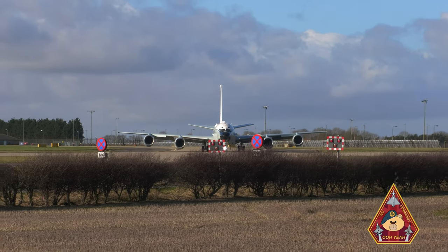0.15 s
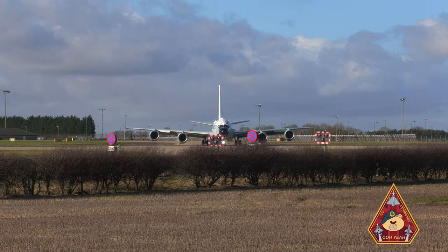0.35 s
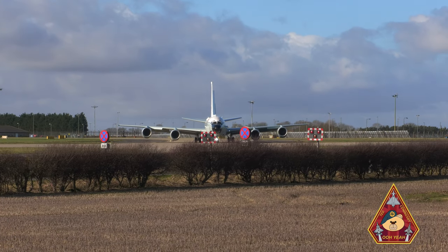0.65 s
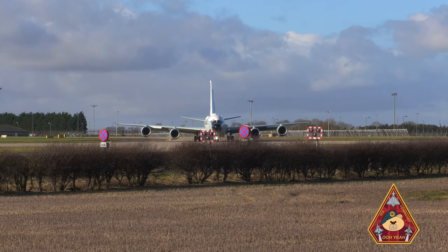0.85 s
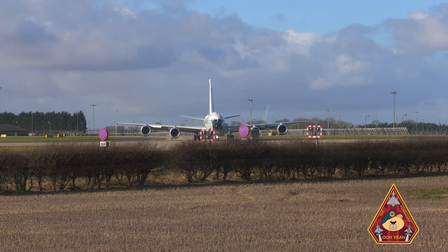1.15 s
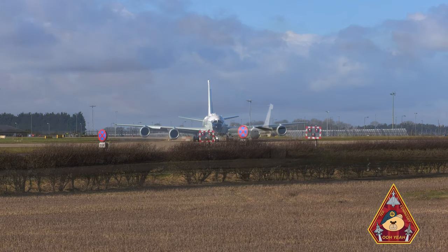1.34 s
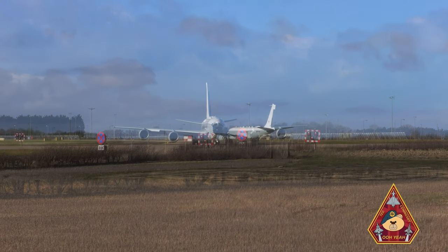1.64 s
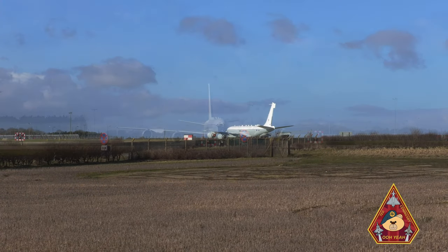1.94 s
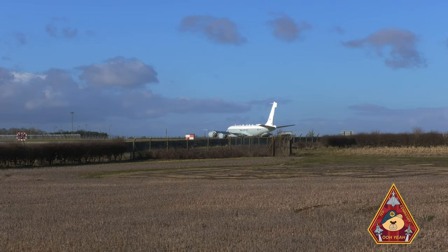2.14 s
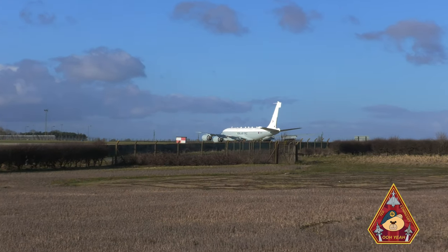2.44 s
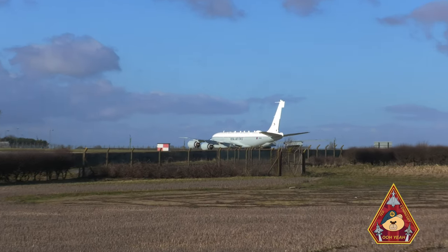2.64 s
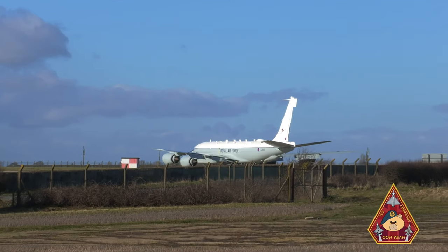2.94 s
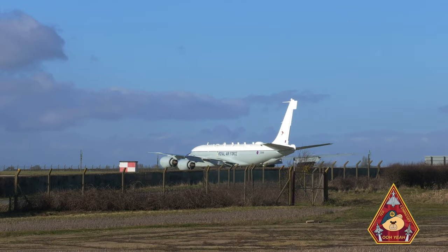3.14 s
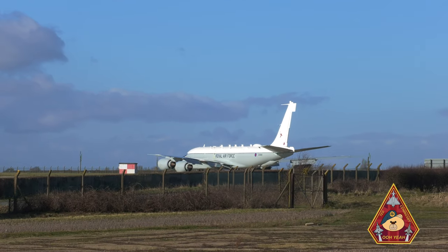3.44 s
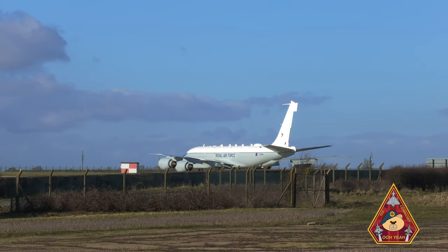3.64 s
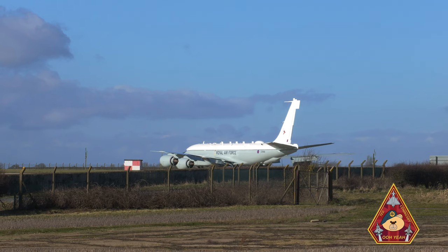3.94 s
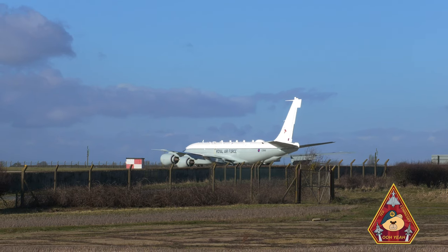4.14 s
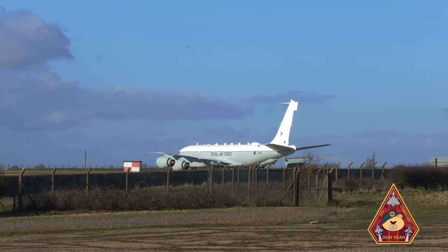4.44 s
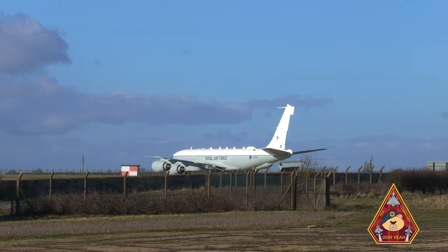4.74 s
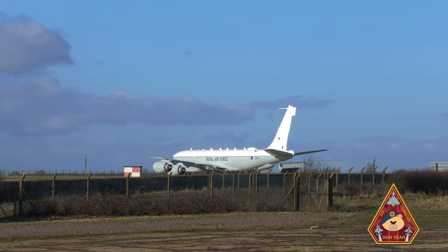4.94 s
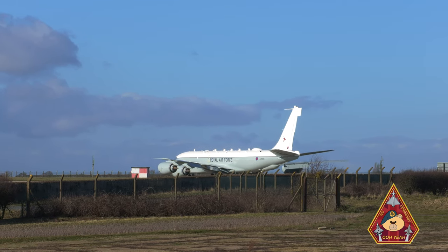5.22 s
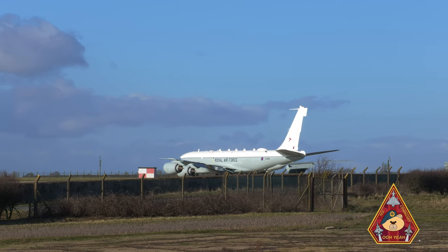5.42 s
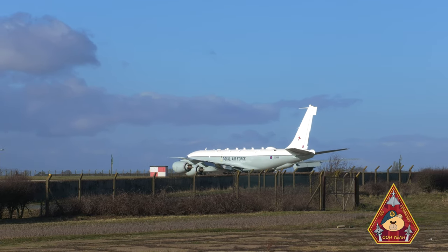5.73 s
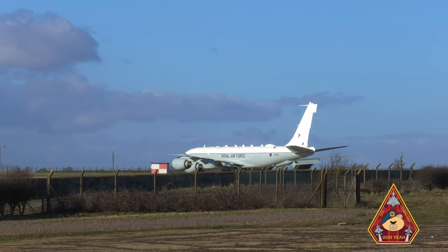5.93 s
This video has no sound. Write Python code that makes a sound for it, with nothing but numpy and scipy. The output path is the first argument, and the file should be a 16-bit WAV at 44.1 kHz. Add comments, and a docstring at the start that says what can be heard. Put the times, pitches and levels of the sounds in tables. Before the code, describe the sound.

Jet engines hiss and whine nose-on across a windy airfield, then blend into a low tail-on roar with a hollow howl and buffeting wind.

```python
"""On a windy airfield, beyond a hedge, jet aircraft are heard in two views: nose-on, then tail-on.
One view crossfades into the other: first intakes hiss and fans whine, then exhausts roar and howl.
Shaped noise makes the hiss, roar and drone; unsteady sine tones make the whines and howls.
Wind rumbles on the microphone, dry stalks rustle and snap, and a thin whistle sounds once.
A limiter holds down the peaks."""
import sys
import numpy as np
from scipy import signal
from scipy.fft import rfft, irfft
from scipy.io import wavfile
from scipy.ndimage import uniform_filter1d, minimum_filter1d

SR = 44100
rng = np.random.default_rng(int(sys.argv[2]) if len(sys.argv) > 2 else 0)


def to_wav(s):
    """Save 16-bit WAV."""
    ch = np.atleast_2d(s).T  # columns
    pcm = np.round(np.clip(ch, -1, 1) * 32767)  # PCM
    wavfile.write(sys.argv[1], SR, pcm.astype(np.int16))


N = 268128
TIME = np.arange(N) / SR  # seconds
BINS = np.fft.rfftfreq(N, 1 / SR)  # Hz
CROSSFADE_START_S, CROSSFADE_LENGTH_S = 1.38, 0.72
# the treble of the nose-on view flares briefly
FLARE_S, FLARE_WIDTH_S = 1.166, 0.26
DRONE_DIP_SHARE = 0.45  # the drone and the howl dip less than the roar


def amp(db):
    """Decibels to gain."""
    return 10 ** (np.asarray(db) / 20)


def evened(x):
    """Scales to rms 1."""
    return x / np.sqrt(np.mean(x ** 2) + 1e-20)


def follow(rows):
    """Draws each column of a table as a curve, sample by sample."""
    s, *columns = np.transpose(rows)
    return [np.interp(TIME, s, column) for column in columns]


def swell(s, width_s):
    """A smooth rise to 1 at the given time, and the fall after it."""
    return np.exp(-((TIME - s) / width_s) ** 2)


def swells(rows):
    """Sum of the swells in a table, in dB."""
    return sum(rise_db * swell(s, width_s) for s, width_s, rise_db, *_ in rows)


def wander(rate_hz):
    """Slow random motion of rms 1, up to about the given rate."""
    spectrum = rfft(rng.standard_normal(N))
    return evened(irfft(spectrum / (1 + (BINS / rate_hz) ** 4), N))


def waver(depth_db, rate_hz):
    """Gain of a sound that moving air makes unsteady."""
    return amp(depth_db * wander(rate_hz))


def colour(points, hz):
    """Gain of a spectrum at the given frequencies."""
    f, db = np.transpose(points)
    return amp(np.interp(np.log(hz + 1), np.log(f + 1), db))


def noise(points):
    """Steady noise of rms 1 with the given spectrum."""
    spectrum = rfft(rng.standard_normal(N))
    return evened(irfft(spectrum * colour(points, BINS), N))


def turbulence(points, patchy_db):
    """Coloured noise that moving air breaks into patches in time and frequency."""
    hz = np.fft.rfftfreq(2048, 1 / SR)
    a, b, patches = rng.standard_normal((3, N // 512 + 5, len(hz)))
    patches = uniform_filter1d(patches, size=9, axis=0)  # smooth in time
    patches = evened(uniform_filter1d(patches, size=16, axis=1))  # smooth in frequency
    frames = (a + 1j * b) * colour(points, hz) * amp(patchy_db * patches)
    return evened(signal.istft(frames.T, nperseg=2048, noverlap=1536)[1][:N])


def treble_of(x, edge_hz):
    """The part of a sound above the given frequency."""
    return irfft(rfft(x) * BINS ** 4 / (BINS ** 4 + edge_hz ** 4), N)


def tone(hz, drift_hz, flutter):
    """A note of drifting pitch; scattered paths flutter around the direct one."""
    cycles = np.cumsum(hz + drift_hz * wander(rate_hz=7.36)) / SR
    paths = 1 + flutter * (wander(rate_hz=22) + 1j * wander(rate_hz=18))
    return evened((paths * np.exp(2j * np.pi * cycles)).real)


def crossfaded():
    """Share of the crossfade done: 0 nose-on view, 1 tail-on view."""
    return np.clip((TIME - CROSSFADE_START_S) / CROSSFADE_LENGTH_S, 0, 1)


def since_crossfade():
    """Seconds since the end of the crossfade, negative before it."""
    return TIME - CROSSFADE_START_S - CROSSFADE_LENGTH_S


def nose_on(fade_power=1.62):
    """Gain of the nose-on view, which fades out fast in the crossfade."""
    return (1 - crossfaded()) ** fade_power


def lull(s=1.52, width_s=0.14, level_db=-4):
    """Gain that sinks while the wind drops."""
    return amp(level_db * swell(s, width_s))


def air(level_db=-69.5, fall_db_per_s=2.5):
    """A faint even hiss of the breeze, slowly dying away."""
    level = amp(level_db - fall_db_per_s * TIME)
    return level * waver(depth_db=0.7, rate_hz=8) * rng.standard_normal(N)


# tone balance of the wind rumble: pitch_hz [Hz], relative_level_db [dB per Hz]
WIND_COLOUR = [(5, -17), (18, -3), (34, -0.5), (55, -0.5), (90, -0.4), (130, -7), (190, -13.5),
               (300, -27.5), (700, -53.5), (4000, -120)]
# gusts: peak_s [s], width_s [s], rumble_rise_db [dB], dip_of_other_sounds_db [dB]; a minus sign reverses either
GUSTS = [(.7, 0.073, 1.5, 1), (1.21, 0.07, 3.5, 0.5), (1.879, 0.024, 8, -1), (2.11, 0.081, 2, 3.5),
         (2.45, 0.063, 8.5, 2), (2.75, 0.12, 7, 1), (2.885, 0.027, -4, 5.5), (3.0, 0.079, 3, 1),
         (3.33, 0.25, 3.5, 1.5), (3.91, 0.054, 9, -2), (4.06, 0.046, 3.5, 4), (4.87, .065, 3, 5.5),
         (5.052, 0.097, 9.5, 3.5), (5.315, 0.054, 11.5, 5.5), (5.71, 0.078, 4, -2.5),
         (5.95, 0.059, 4.5, -2.5)]


def wind(start_db=-23, growth_db_per_s=0.5):
    """Eddies at the microphone make a lumpy rumble that freshens slowly and follows the gusts."""
    eddies = noise(WIND_COLOUR)
    eddies /= np.sqrt(uniform_filter1d(eddies ** 2, size=6000))  # removes chance swells
    level = amp(start_db + growth_db_per_s * TIME + swells(GUSTS))
    return level * waver(depth_db=1.1, rate_hz=14) * eddies


def dips():
    """Gain of other sounds in the gusts: mostly it sinks briefly, sometimes it rises."""
    return amp(-sum(dip_db * swell(s, width_s) for s, width_s, _, dip_db in GUSTS))


# tone balance of the rustle: pitch_hz [Hz], relative_level_db [dB per Hz]
RUSTLE_COLOUR = [(800, -30.5), (4000, 0.5), (7500, 7.5), (8600, -17.5), (12000, -17.5), (15500, -23)]
# tone balance of the ticks and snaps: pitch_hz [Hz], relative_level_db [dB per Hz]
SNAP_COLOUR = [(1500, -25), (4500, 3.5), (7500, 9.5), (9000, -0.5), (13000, 1), (15500, -5.5)]
# flurries of rustling: peak_s [s], width_s [s], rise_db [dB]
FLURRIES = [(2.26, .12, 9), (4.38, .13, 13), (4.6, .07, 14), (5.21, 0.097, 14), (5.46, 0.097, 16),
            (5.91, 0.14, 16)]


def stalks(early_db=-65.5, late_db=-74.5, grain_db=2.5, ticks_per_s=35, tick_db=7, tick_s=0.001):
    """Dry stalks make a grainy rustle with scattered ticks; both rise in flurries."""
    level_db = early_db + (late_db - early_db) * crossfaded() + swells(FLURRIES)
    grain = evened(waver(grain_db, rate_hz=90))
    rustle = grain * noise(RUSTLE_COLOUR)
    knocks = (rng.random(N) < ticks_per_s / SR) * np.minimum(rng.exponential(1, N), 2)
    # each knock dies away over about tick_s
    envelope = signal.lfilter([1], [1, -np.exp(-1 / (tick_s * SR))], knocks + 1e-12)
    ticks = amp(tick_db) * crossfaded() * envelope * noise(SNAP_COLOUR)  # tick_db is against the rustle
    return amp(level_db) * (rustle + ticks)


# loudest snaps among the stalks: peak_s [s], relative_level_db [dB]
SNAPS = [(3.7025, -49), (4.2936, -46), (4.399, -44), (4.5685, -35), (4.5899, -40), (4.603, -45),
         (4.618, -44), (4.7875, -49), (5.258, -39.5), (5.3886, -42), (5.892, -39), (5.9528, -45),
         (6.0152, -40)]


def snaps(snap_s=0.0026, trim_db=-2):
    """Stalks knock together: each snap is a few milliseconds of bright noise."""
    envelope = np.zeros(N)
    for s, db in SNAPS:
        age = np.clip((TIME - s) / snap_s + 1, 0, 25)  # 1 at the peak
        envelope += amp(db + trim_db) * age * np.exp(-age)
    return envelope * noise(SNAP_COLOUR)


def whistle(s=2.75, width_s=0.1, hz=5735, level_db=-63):
    """One faint, thin note that swells and fades."""
    return amp(level_db) * swell(s, width_s) * tone(hz, drift_hz=6, flutter=0.2)


# tone balance of the drone: pitch_hz [Hz], relative_level_db [dB per Hz]
DRONE_COLOUR = [(30, -39.5), (110, -15.5), (195, -3), (275, -1.5), (345, 4.3), (400, 1), (460, -4.5),
                (540, -10.5), (750, -16.5), (1200, -37), (5000, -100)]
# loudness of the drone, weakest early in the crossfade: time_s [s], level_db [dB]
DRONE_LEVEL = [(0, -28.5), (1.15, -26), (1.55, -33.5), (2.2, -28), (3.15, -24.5), (6.08, -23.5)]
# tone balance of the roar: pitch_hz [Hz], relative_level_db [dB per Hz]
EXHAUST_COLOUR = [(280, -36.5), (530, -14.5), (680, -4), (770, -3), (950, -7.5), (1400, -10.5), (2020, -19),
                  (2330, -17.5), (2900, -24.5), (3500, -28), (4250, -38), (5400, -40.5), (6400, -53),
                  (9500, -64)]
# surges of roar carried over by the breeze: peak_s [s], width_s [s], rise_db [dB]
SURGES = [(2.31, 0.062, -0.5), (2.53, .04, 0), (2.76, 0.15, 1), (3.22, 0.097, 3.5), (3.45, 0.075, 2.5),
          (3.73, .055, 2.5), (4.7, 0.11, 1.2), (5.93, 0.07, 1.5)]


def exhausts(nose_db=-44, tail_db=-28.5, growth_db_per_s=0.79, fade_power=0.6,
             deepen_s=5.83, deepen_width_s=0.22, deepen_db=4.5, deep_hz=660, deep_width_hz=120,
             treble_hz=3200, treble_db=1.65, treble_fall_db_per_s=0.38):
    """Jets mixing with air roar, slowly dulling, above the low drone of the engine cores."""
    roar = turbulence(EXHAUST_COLOUR, patchy_db=0.68)
    low_mid = irfft(rfft(roar) * np.exp(-((BINS - deep_hz) / deep_width_hz) ** 2), N)
    deep_db = deepen_db * swell(deepen_s, deepen_width_s)
    bright_db = treble_db - treble_fall_db_per_s * since_crossfade()
    treble = treble_of(roar, treble_hz)
    roar = roar + (amp(deep_db) - 1) * low_mid + (amp(bright_db) - 1) * treble

    # the tail-on roar fades in early in the crossfade, then keeps growing
    tail_on = amp(tail_db + growth_db_per_s * since_crossfade()) * crossfaded() ** fade_power
    gain = amp(nose_db) * nose_on() + tail_on
    drone_db, = follow(DRONE_LEVEL)
    drone = amp(drone_db) * turbulence(DRONE_COLOUR, patchy_db=1.0)
    carried = amp(swells(SURGES)) * dips()
    unsteady_roar = gain * waver(depth_db=0.86, rate_hz=16) * roar
    return unsteady_roar * carried + drone * carried ** DRONE_DIP_SHARE


# long swells of the howl: peak_s [s], width_s [s], level_db [dB]
HOWLS = [(1.7, .24, -25.5), (2.08, 0.25, -16.5), (2.5, 0.33, -18), (3.35, 0.44, -26), (3.85, 0.15, -21),
         (4.33, 0.4, -18.5), (5.8, 0.67, -37)]
# pitch of the stronger howl, mostly creeping upward: time_s [s], pitch_hz [Hz]
HOWL_PITCH = [(1.4, 402), (2.1, 408), (3.62, 411), (3.83, 417), (4.25, 413), (4.42, 417.5), (6.08, 425)]


def howls(neighbour_ratio=1.085, neighbour_db=-12.5):
    """Two exhaust ducts sing near-pure notes, the second higher and weaker."""
    gain = sum(amp(level_db) * swell(s, width_s) for s, width_s, level_db in HOWLS)
    hz, = follow(HOWL_PITCH)
    flutter = np.interp(TIME, [2.2, 4.0], [0.15, 0.33])  # the note grows less steady
    strong = tone(hz, drift_hz=1.08, flutter=flutter)
    weak = amp(neighbour_db) * tone(neighbour_ratio * hz, drift_hz=3.5, flutter=0.45)
    return gain * (strong + weak) * dips() ** DRONE_DIP_SHARE


# tone balance of the intake hiss: pitch_hz [Hz], relative_level_db [dB per Hz]
INTAKE_COLOUR = [(200, -39), (480, -17), (730, -12), (1050, -11), (1300, -6), (1500, -10.5), (1820, -10),
                 (2650, -14.5), (2970, -21), (3500, -21), (4400, -34.5), (5350, -39), (6400, -58),
                 (9000, -80), (13000, -96.5)]
# faint shaft and compressor tones: pitch_hz [Hz], level_against_hiss_db [dB, before the flare]
WHINES = [(942, -20), (1262, -21), (1750, -24.5), (1884, -24), (2368, -25.5), (3320, -30.5), (3806, -31),
          (4098, -38), (5173, -37.5)]


def intakes(level_db=-19, treble_flare_db=9, whine_flare_db=4):
    """Blades make a broad hiss with thin compressor whines; its treble and the whines flare once."""
    flare = swell(FLARE_S, FLARE_WIDTH_S)
    hiss = turbulence(INTAKE_COLOUR, patchy_db=1.5)
    extra_treble = (amp(treble_flare_db * flare) - 1) * treble_of(hiss, 3600)
    whines = sum(amp(db) * tone(hz, drift_hz=3.4, flutter=0.88) for hz, db in WHINES)
    whines = whines * amp(whine_flare_db * flare)
    return amp(level_db) * nose_on() * (hiss + extra_treble + whines)


# blade-passing pitch of each fan: pitch_hz [Hz]
FAN_HZ = (1346, 1366.7, 1385)
# each fan swells once; levels are those before the swell and flare:
# level_db [dB], octave_level_db [dB], swell_peak_s [s], swell_width_s [s], swell_db [dB]
FANS = [(-33, -40.5, .3, .4, 5), (-30, -37, 1.38, .3, 10), (-28, -38.5, 0.044, 0.055, 11.5)]


def fans(octave_flare_db=6, octave_swell_share=0.21):
    """Fans at nearly equal speeds beat against each other, each with its octave."""
    out = np.zeros(N)
    flare_db = octave_flare_db * swell(FLARE_S, FLARE_WIDTH_S)
    for hz, (level_db, octave_db, s, width_s, swell_db) in zip(FAN_HZ, FANS):
        rise_db = swell_db * swell(s, width_s)
        octave_rise_db = flare_db + octave_swell_share * rise_db
        out += amp(level_db + rise_db) * tone(hz, drift_hz=1.2, flutter=0.19)
        out += amp(octave_db + octave_rise_db) * tone(2 * hz, drift_hz=2.2, flutter=0.2)
    return nose_on() * out


def scene():
    """Wind, stalks and a whistle around the two views of jet aircraft."""
    breeze = (wind() + (stalks() + air()) * dips()) * lull()
    aircraft = exhausts() + howls() + (intakes() + fans()) * dips()
    return (breeze + snaps() + whistle() + aircraft)[None]


def record(dry, ceiling_db=-6.5, recover_db_per_s=70, edge_hz=15760):
    """A limiter ducks everything under the largest peaks; then the highest treble is cut."""
    over_db = np.maximum(20 * np.log10(abs(dry[0]) + 1e-9) - ceiling_db, 0)
    # the duck jumps to each peak and recovers at a steady rate
    fall = TIME * recover_db_per_s
    duck_db = np.maximum.accumulate(over_db + fall) - fall
    gain_db = uniform_filter1d(minimum_filter1d(-duck_db, size=90), size=45)
    limited = dry * amp(uniform_filter1d(gain_db, size=45))
    limited = limited * signal.windows.tukey(N, 0.0008)  # very short fades at both ends
    low_pass = signal.firwin(511, edge_hz, window=("kaiser", 9), fs=SR)
    return signal.oaconvolve(limited, low_pass[None], "same")


dry = scene()
out = record(dry)
to_wav(out)
```